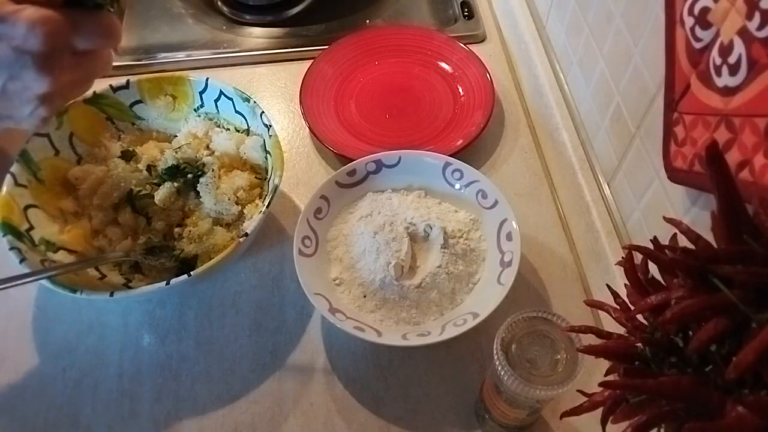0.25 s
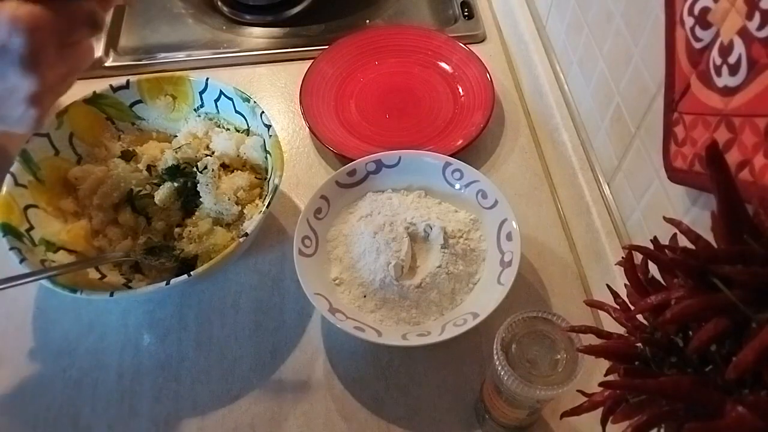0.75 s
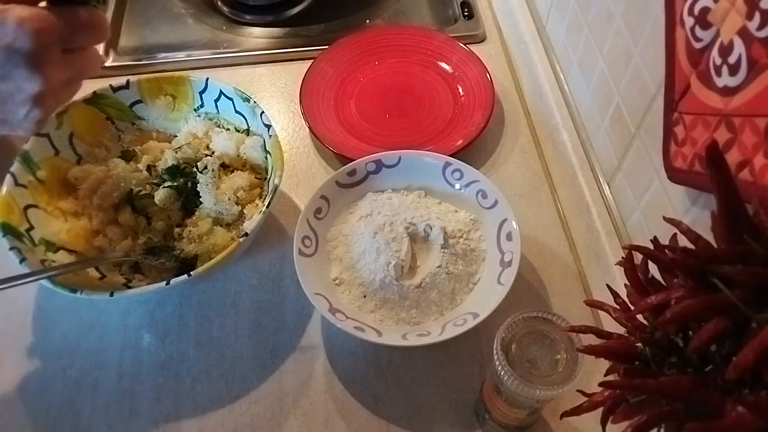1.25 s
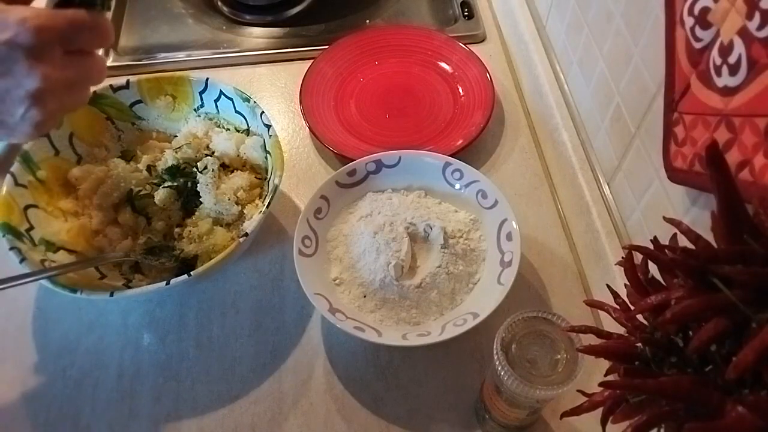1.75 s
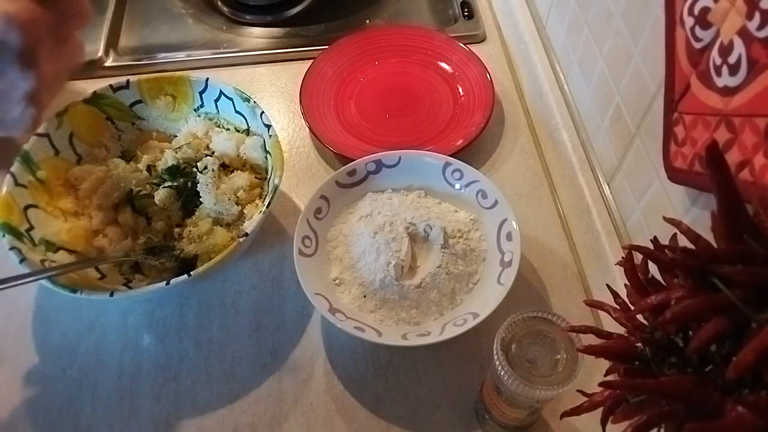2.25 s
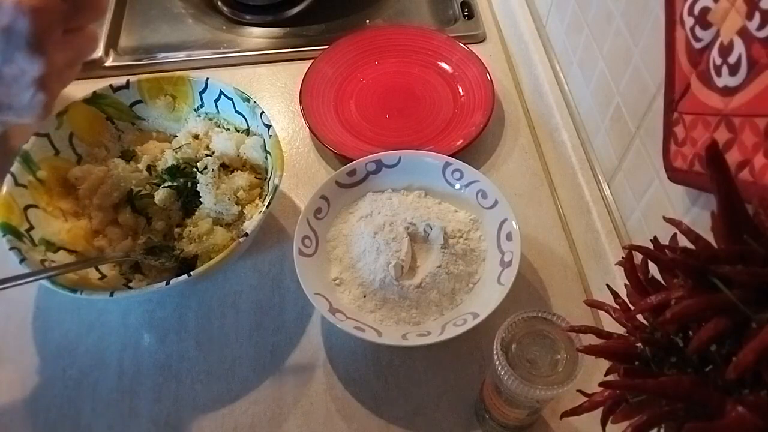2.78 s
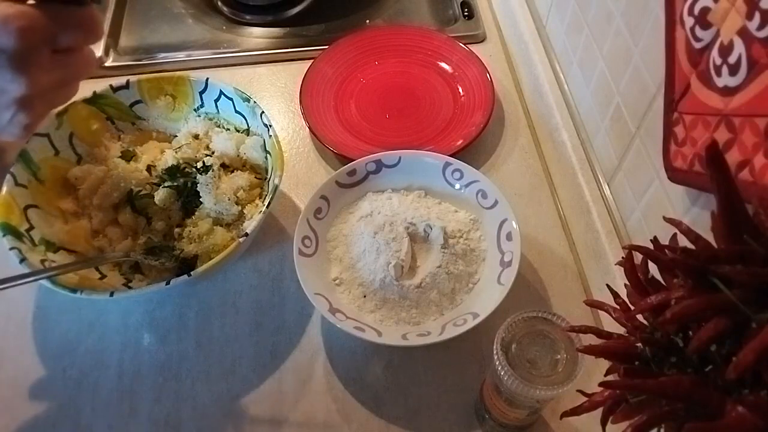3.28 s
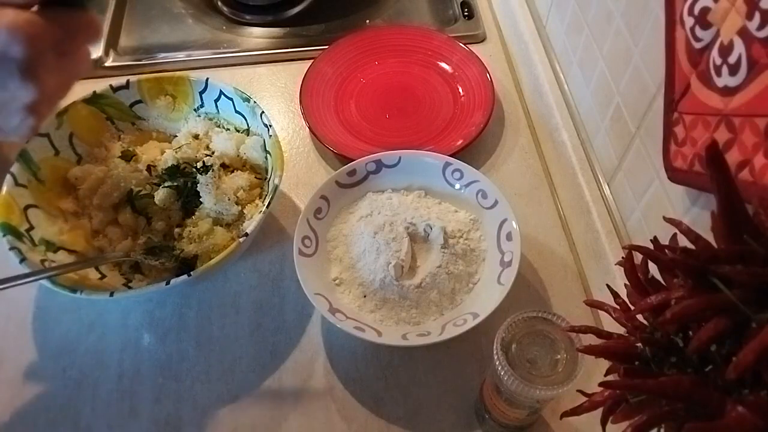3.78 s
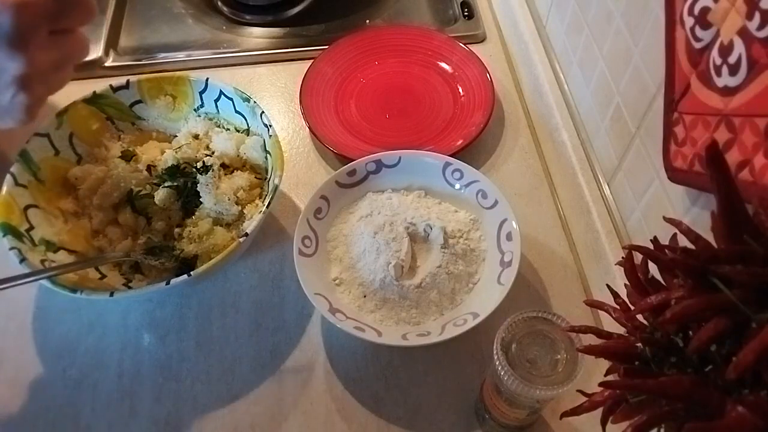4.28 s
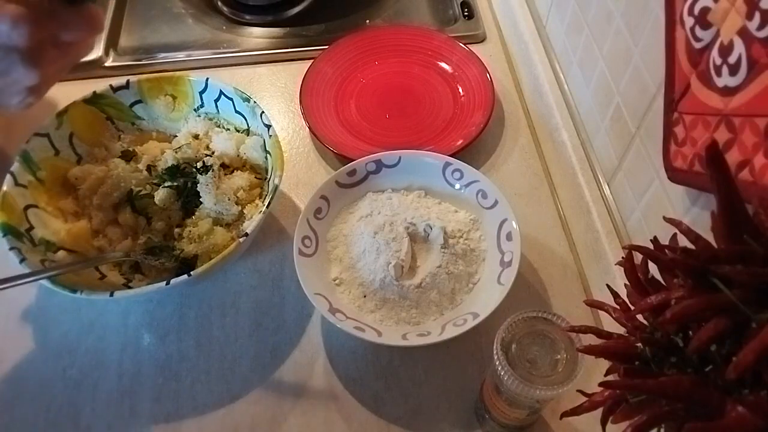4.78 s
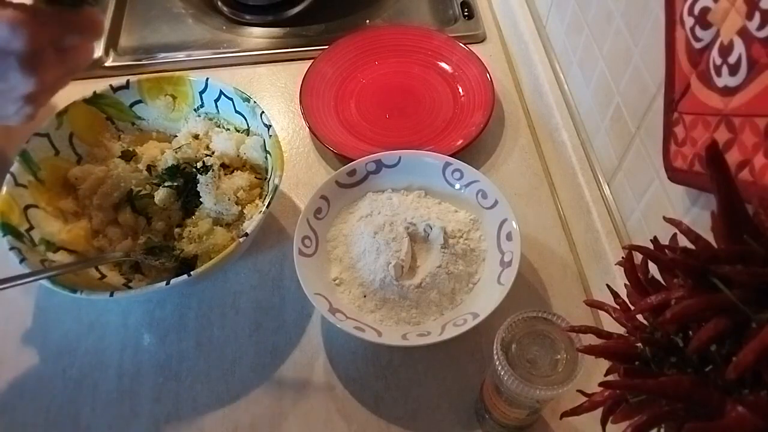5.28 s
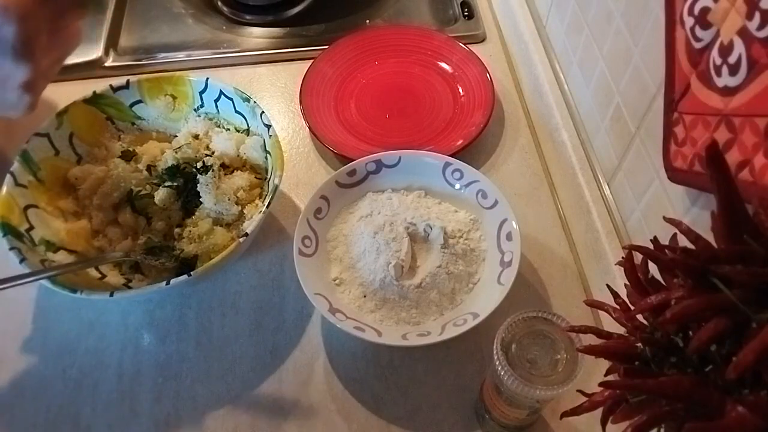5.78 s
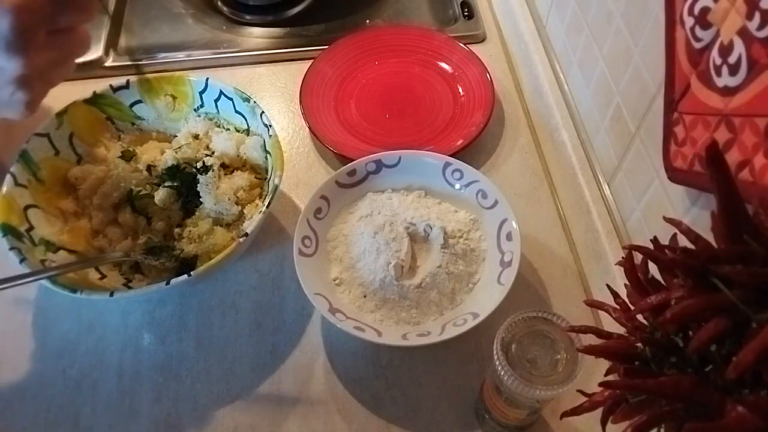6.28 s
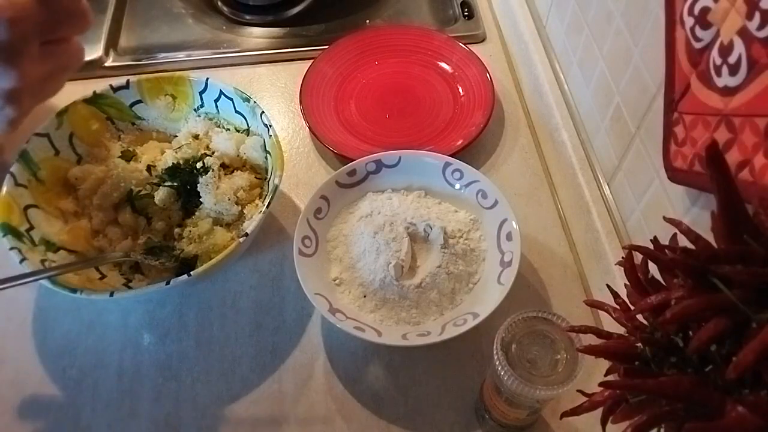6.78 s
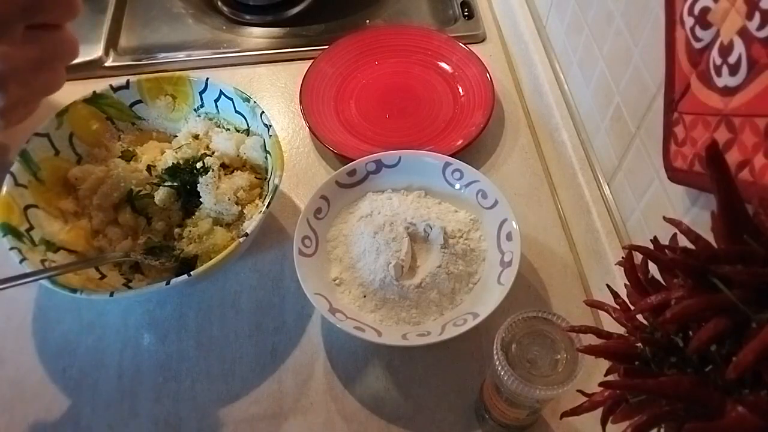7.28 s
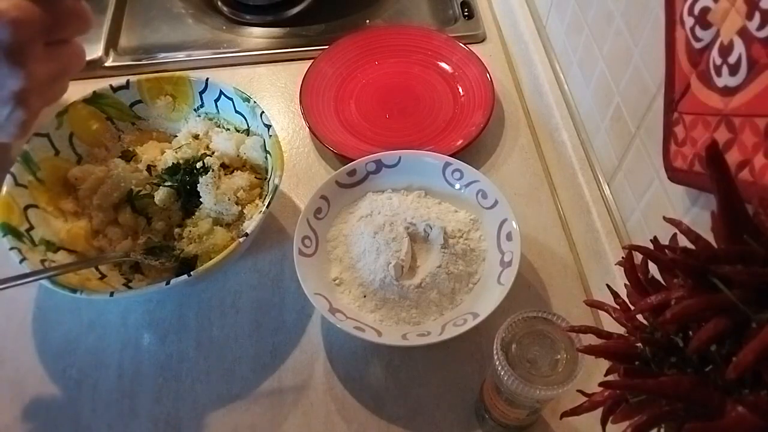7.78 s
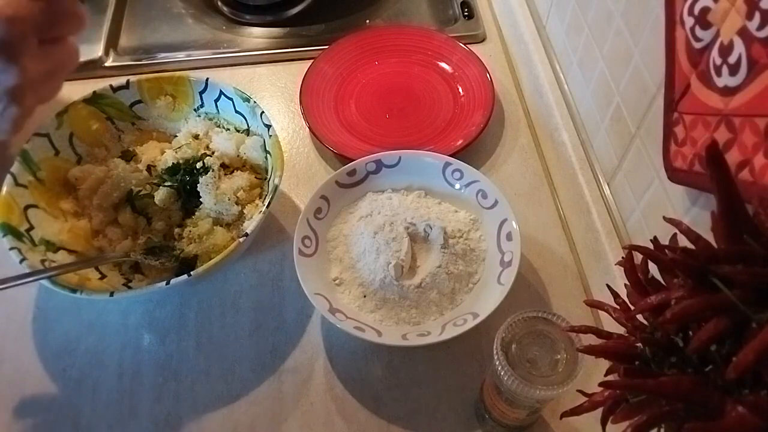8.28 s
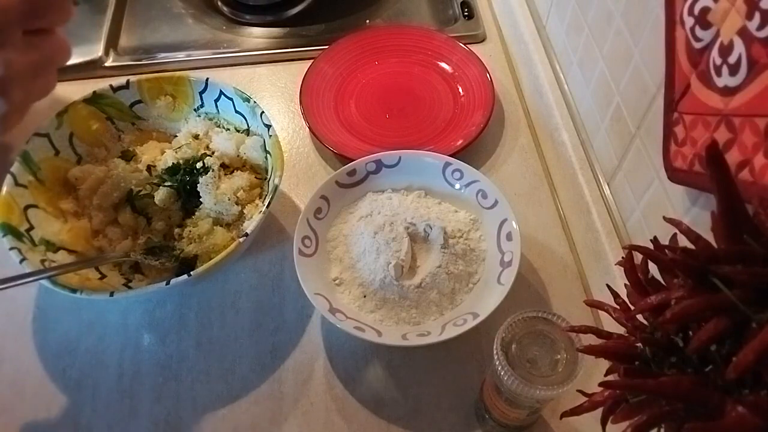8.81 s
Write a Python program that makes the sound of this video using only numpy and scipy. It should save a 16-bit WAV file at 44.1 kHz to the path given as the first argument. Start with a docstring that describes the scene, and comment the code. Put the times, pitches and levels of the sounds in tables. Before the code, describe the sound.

A constant low fan drone with electrical hum fills a hard, tiled kitchen. Over it, close and bright, kitchen scissors snip through parsley about twelve times in nine seconds, slightly unevenly. Every snip is a cluster of tiny crunchy clicks from leaves and stalks, with a thin metallic edge and a very short echo; the bunch rustles softly as it is shifted between cuts.

```python
"""Scissors cutting parsley under an extractor fan

Kitchen scissors cut a bunch of parsley close to a stereo microphone. Stalks and leaves crack in bursts of
tiny clicks: noise gated by random decays, coloured by fibre thickness and ringing steel. Tiles add echoes.
An extractor fan drones: blade tone, mains hum and other steady tones, and air noise ringing room modes.
"""
import sys
import numpy as np
from scipy import signal
from scipy.fft import rfft, irfft, next_fast_len
from scipy.io import wavfile
from scipy.ndimage import uniform_filter1d

SR = 44100
rng = np.random.default_rng(int(sys.argv[2]) if len(sys.argv) > 2 else 0)


def master_out(mix):
    """Clip the mix to full scale and print it as 16-bit PCM to the path in sys.argv[1]."""
    frames = np.transpose(np.atleast_2d(mix))
    ceiling = np.clip(frames, -1, 1)
    pcm = np.round(ceiling * 32767).astype(np.int16)
    wavfile.write(sys.argv[1], SR, pcm)


N = 399105

# crack spectrum at each port, relative: f/Hz, left level/dB, right level/dB
CRACK_SPECTRUM = [(1280, -24, -13.5), (2040, -22.5, -22.5), (3010, -23.5, -19.5), (4140, -17.5, -14),
                  (5530, -10, -8.5), (7100, -7.5, -7), (8530, -8, -7), (10630, -5, 0), (11630, -3.5, 0),
                  (11900, 2.5, 2), (14800, 2.5, 0), (14600, -4, 2), (15900, 3, 3)]
# steel resonances: f/Hz, width/Hz, level over plain crack/dB
STEEL_MODES = [(2330, 96, 0.5), (6180, 190, -10), (7830, 240, -4.5)]
# crossovers between the six fibre bands, two bands per thickness: f/Hz
BAND_EDGES_HZ = [3200, 4500, 6500, 9000, 12500]


def scissors():
    """Snapping fibres excite the steel: thick ones sound low, thin ones high, each at its own moments."""
    size = next_fast_len(N)
    hz = np.arange(size // 2 + 1) * SR / size
    steel = 1 + sum(undb(db) / (1 + 2j * (hz - f) / width) for f, width, db in STEEL_MODES)
    ports_db = [on_log(hz, CRACK_SPECTRUM, order=1), on_log(hz, CRACK_SPECTRUM, order=2)]
    colour = steel * undb(ports_db)
    lowpasses = [1 / (1 + (hz / edge) ** 10) for edge in BAND_EDGES_HZ]
    band_powers = np.diff([0 * hz] + lowpasses + [1 + 0 * hz], axis=0)
    filters = colour * np.sqrt(band_powers)[:, None]
    # unit rms per thickness, over its two bands
    band_ms = np.mean(abs(filters) ** 2, axis=(1, 2))
    thickness_rms = np.sqrt(band_ms.reshape(3, 2).sum(axis=1))
    power = crack_power() + undb(2 * rustle_db())
    noise, out = port_noise(), 0
    for envelope, response, rms in zip(power, filters, np.repeat(thickness_rms, 2)):
        clicks = np.sqrt(envelope * click_power()) * noise
        out = out + rfft(clicks, size) * response / rms
    return irfft(out, size)[:, :N]


STALK_SPREAD_DB = 2.


def crack_power():
    """Each crack swells and decays exponentially in power; its two bands per thickness tilt at random."""
    span = SR // 5
    power = np.zeros((6, N + span))
    rows = cracks()
    tilts_db = STALK_SPREAD_DB * rng.standard_normal((len(rows), 3, 1)) * [1, -1]
    for (t, *thickness_db, rise_ms, fall_ms), tilt_db in zip(rows, tilts_db):
        start = int(t * SR)
        # power decays twice as fast as amplitude
        shape = swell(span, span // 2, rise_ms * SR / 2000, fall_ms * SR / 2000)
        bands_db = np.c_[thickness_db] + tilt_db
        power[:, start:start + span] += undb(2 * bands_db).reshape(-1, 1) * shape
    return power[:, span // 2:span // 2 + N]


# stalks snapping at once: t/s, middle-fibre level/dB, thin over middle level/dB, fall/ms
STALK_SNAPS = [(.4289, -64.5, -3, 4.4), (0.531, -64.5, 26, 1.6), (.594, -52.5, 16, 1.8),
               (.6145, -60, 11, 4), (.7656, -68, 13, 4), (.779, -58.5, 9.5, 6.2), (1.4868, -48.5, 3, 5.5),
               (1.9287, -70, 17, 4.4), (1.981, -64, 16, 2.4), (2.11, -55.5, 9, 19), (2.1532, -61, 5, 25),
               (2.2052, -62, 6, 7), (2.535, -62, -12, 5), (2.7768, -52, 11, 2.1), (2.7961, -57, 14, 4),
               (2.8277, -38.5, 5, 3.7), (2.875, -64, 11, 4), (2.9017, -61.5, 17, 5),
               (3.2016, -54.5, -17, 1.2), (3.348, -69, 11, 4.4), (3.4518, -77, 18, 4),
               (3.5151, -65.5, 18.5, 5.6), (3.607, -48, 4, 3.8), (4.0066, -66, -16, 3.5),
               (4.2224, -75, 15, 4.5), (4.243, -63, 21, 2.6), (4.332, -48.5, 2, 8.2),
               (4.3687, -58.5, -2, 14), (4.4503, -45, -3, 3.3), (4.467, -52, 11, 1.6), (4.4762, -45, -4, 2),
               (4.4913, -35, -8, 1.7), (4.5011, -36.5, 1, 2.4), (4.8621, -75, 8, 10.5),
               (5.0068, -55, 15, 3.2), (5.019, -56, 13, 4.7), (5.043, -56, 12, 14), (5.066, -42, 7, 3.4),
               (5.1037, -54, 7, 4.2), (5.118, -52, 4, 3.9), (5.1929, -42.5, 1.5, 1.4),
               (5.215, -58.5, 1, 13), (5.5136, -62, 2, 4.3), (5.6083, -73, 10.5, 7), (5.64, -67, 12, 17),
               (5.672, -50.5, -22, 5.1), (5.7665, -63, 5, 9), (5.7922, -62.5, 0, 7.2),
               (6.279, -49.5, -1, 3.6), (6.3719, -67, 3, 3.4), (6.395, -52, 9.5, 1.9),
               (6.4637, -56.5, 2, 4), (6.4724, -47.5, -5, 3.7), (7.3754, -70, 20, 6),
               (7.4218, -49.5, 4, 3.6), (7.447, -51, 6, 6.5), (7.4573, -48, 3, 6.5),
               (7.5068, -46.5, 1, 4.1), (7.9273, -79, 21, 3.8), (7.9394, -54.5, 8.5, 20),
               (7.9683, -49, 12, 4), (7.973, -45.5, 13, 2.3), (8.0183, -60, 14, 4.5), (8.0304, -57, 4, 7.4),
               (8.05, -52, 5, 4.7), (8.088, -49.5, 8, 4.5), (8.245, -72, 0, 3), (8.6164, -63, 7, 21),
               (8.644, -50, -4, 2.7), (8.656, -52, 0, 2.1)]
SNAP_RISE_MS = 0.87
# leaf wads crushed, swelling as they give way: peak t/s, middle-fibre level/dB, thin over middle level/dB, fall/ms
LEAF_CRUSHES = [(.5563, -64, 16, 4.5), (.5831, -62, 3, 8), (0.624, -56.5, 8, 11), (0.649, -44, 6.5, 6.3),
                (1.3932, -66, -9, 7), (1.429, -53, 4, 6.2), (1.442, -54.5, 1.2, 15), (1.461, -50, 4, 6.8),
                (1.495, -46.5, 5, 4), (1.619, -53, 14, 4.3), (2.0435, -71, 16, 16), (2.236, -56.5, 3, 7),
                (2.7028, -64, 6, 6), (2.729, -62, 9, 8.9), (2.7832, -64, 16, 5), (2.813, -40.5, 4.5, 7.4),
                (3.526, -63.5, 14, 3), (3.5656, -74, 10.5, 5), (3.5884, -52.5, 10.5, 5.7),
                (3.7234, -59, 10, 7.3), (4.254, -49, 12, 4.2), (4.281, -54, 0, 17), (4.305, -39.5, -2, 4.5),
                (5.7058, -62.5, -8, 20), (6.3, -62.5, 5, 21), (6.4075, -60, -6, 6.5),
                (7.984, -48.5, 3, 5.3), (8.059, -54, 6, 6.5), (8.077, -45.5, 0, 5.1),
                (8.5288, -48.5, 1, 6.9), (8.5534, -59, 0, 16)]
CRUSH_RISE_PER_FALL = 0.85
# blade closings: start t/s, shut t/s, rustle level before band weights/dB, thick over middle level when shut/dB
BLADE_CLOSINGS = [(0.505, 0.783, -69, -3), (1.394, 1.64, -70.5, -3), (1.934, 2.24, -71.5, -14),
                  (2.704, 2.907, -69.5, -8), (3.444, 3.734, -70, -3.5), (4.21, 4.53, -77, -4),
                  (4.983, 5.24, -71.5, -10), (5.606, 5.825, -70, -0.5), (6.285, 6.535, -70, -7),
                  (7.374, 7.51, -64, -13.5), (7.922, 8.1, -76, -7.5), (8.516, 8.66, -67.5, -12)]
THICKEN_DB, LOOSE_DB = 7.5, -14  # thick-fibre rise over a closing; thick over middle between closings


def cracks():
    """Rows t/s, thick, middle, thin level/dB, rise/ms, fall/ms; thicker stalks give way late in a closing."""
    snaps = [(*row, SNAP_RISE_MS) for row in STALK_SNAPS]
    crushes = [(*row, CRUSH_RISE_PER_FALL * row[-1]) for row in LEAF_CRUSHES]
    t, middle_db, thin_db, fall_ms, rise_ms = np.array(snaps + crushes).T
    thick_db = np.full(len(t), 1. * LOOSE_DB)
    for start, shut, _, shut_db in BLADE_CLOSINGS:
        still_open = (shut - t) / (shut - start)
        closing = abs(still_open - .5) < .56  # 6 % margin at each end
        thick_db = np.where(closing, shut_db - THICKEN_DB * still_open, thick_db)
    return np.c_[t, middle_db + thick_db, middle_db, middle_db + thin_db, rise_ms, fall_ms]


# bunch shifting between closings: start t/s, end t/s, level before band weights/dB
BUNCH_SHIFTS = [(0, 0.102, -72.5), (0.297, 0.452, -77), (2.492, 2.62, -79), (3.2, 3.256, -68),
                (3.34, 3.38, -75), (4.01, 4.135, -80), (4.85, 4.89, -78), (5.422, 5.54, -73),
                (6.034, 6.215, -76), (6.677, 6.784, -70.5), (7.04, 7.13, -74.5), (7.25, 7.292, -75),
                (7.793, 7.88, -75.5), (8.41, 8.48, -78), (8.953, 9.05, -88)]
# rustle weight of each fibre band, low to high: level/dB
RUSTLE_BANDS_DB = [-11, -10.5, -10.5, -4, -4.5, -0.5]
CLOSING_RISE_MS, CLOSING_FALL_MS = 14, 67
SHIFT_RISE_MS, SHIFT_FALL_MS = 9, 20
HAND_DB = -87.5  # constant floor, before band weights
RUSTLE_FLICKER_DB, RUSTLE_PATCHY_DB = 2., 2.  # common to all bands; separate in each


def rustle_db():
    """Leaves brush along closing blades and in the hand as the bunch shifts; each band flickers."""
    power = undb(2 * HAND_DB)
    for start, shut, db, _ in BLADE_CLOSINGS:
        power = power + undb(2 * db) * held(start, shut, CLOSING_RISE_MS, CLOSING_FALL_MS)
    for start, end, db in BUNCH_SHIFTS:
        power = power + undb(2 * db) * held(start, end, SHIFT_RISE_MS, SHIFT_FALL_MS)
    bands_db = np.array([db + RUSTLE_PATCHY_DB * walk(14) for db in RUSTLE_BANDS_DB])
    return 10 * np.log10(power) + RUSTLE_FLICKER_DB * walk(40) + bands_db


def held(start_s, end_s, rise_ms, fall_ms):
    """Power envelope: exponential rise before start, 1 until end, exponential fall after."""
    t = np.arange(N) / SR
    before, after = np.maximum(start_s - t, 0), np.maximum(t - end_s, 0)
    return np.exp(-2000 * (before / rise_ms + after / fall_ms))


def swell(size, peak, rise, fall):
    """Exponential rise to a peak and fall from it, all in samples."""
    n = np.arange(size) - peak
    return np.exp(np.where(n < 0, n / rise, -n / fall))


CLICKS_PER_S, CLICK_SPREAD_DB, CLICK_MS = 3500, 2., .5  # spread: mean of exponential; ms: amplitude decay


def click_power():
    """Fibres break at random in decaying clicks of uneven size; mean power 1."""
    struck = rng.random(N) < CLICKS_PER_S / SR
    sizes = struck * undb(2 * CLICK_SPREAD_DB * rng.exponential(size=N))
    power = signal.lfilter([1], [1, -np.exp(-2000 / (CLICK_MS * SR))], sizes)
    return power / power.mean()


SHARED, LEFT_LAG_MS = 0.19, .27  # power fraction common to both ports


def port_noise():
    """Unit-rms noise, partly common to both ports; the common part reaches the left later."""
    common, own = rng.standard_normal(N), rng.standard_normal((2, N))
    common = np.array([np.roll(common, int(LEFT_LAG_MS * SR / 1000)), common])
    return np.sqrt(SHARED) * common + np.sqrt(1 - SHARED) * own


# tile echo bands: centre f/Hz, near-echo t60/s, relative level/dB
TILE_BANDS = [(2860, 0.13, 4), (5840, 0.06, -6), (12200, 0.1, -4)]
FAR_DB, FAR_LONGER = -17, 5.2  # far tail relative to near: level, t60 ratio


def tiles(dry):
    """Dense echoes of near tiles and a weaker, longer tail from far walls, as decaying band noise."""
    t = np.arange(SR // 2) / SR
    echo = np.zeros((2, len(t)))
    echo[:, 0] = 1  # direct sound
    for hz, t60, db in TILE_BANDS:
        band = signal.butter(2, [hz / 1.5, hz * 1.5], "band", fs=SR, output="sos")
        tail = signal.sosfilt(band, rng.standard_normal((2, len(t))))
        near = np.exp(-np.log(1000) * t / t60)
        far = undb(FAR_DB) * np.exp(-np.log(1000) * t / (t60 * FAR_LONGER))
        fade = near + far
        echo += undb(db) * tail * fade / np.sqrt(np.sum(fade ** 2))
    return signal.fftconvolve(dry, echo, axes=1)[:, :N]


def fan():
    """Extractor fan: tones of motor and blades over its air noise."""
    tones = steady_tones() + blade_tone()
    return fan_air() + np.sqrt(2) * tones.imag  # sqrt(2): rms to peak


# blade tone: t/s, level/dB rms before pan
BLADE_LEVEL = [(0, -41.5), (3, -41), (6, -43.5), (7.8, -42.5), (9.05, -49.5)]
BLADE_HZ, BLADE_PAN_DB, BLADE_LEAD_RAD, BLADE_WAVER_RAD = 173.9, 3.5, -0.087, 0.54


def blade_tone():
    """Blades passing on a slightly unsteady shaft give a tone of wandering phase; complex."""
    t = np.arange(N) / SR
    phase = 2 * np.pi * BLADE_HZ * t + BLADE_WAVER_RAD * walk(1.483)
    level_db = np.interp(t, *np.transpose(BLADE_LEVEL))
    return placed(level_db, BLADE_PAN_DB, BLADE_LEAD_RAD) * np.exp(1j * phase)


# mains hum and other steady tones: f/Hz, level/dB rms before pan, left minus right/dB, left lead/rad
STEADY_TONES = [(100, -51, 1, .15), (546, -64, 5, .2), (1446, -85, -9, -2.9)]


def steady_tones():
    """Constant sinusoids, complex: mains hum and two higher tones."""
    t = np.arange(N) / SR
    return sum(placed(db, pan_db, lead) * np.exp(2j * np.pi * f * t) for f, db, pan_db, lead in STEADY_TONES)


# air noise between modes, and microphone hiss: f/Hz, level/dB per Hz before pan, left minus right/dB
AIR_SPECTRUM = [(20, -100, 18), (45, -95, -3), (77, -83, 1), (292, -83, 9), (449, -77.5, -9),
                (764, -83, -3.5), (1117, -97, 0.5), (1475, -101, -9.5), (1890, -106, -2),
                (3570, -116, -3.5), (8150, -121, -1), (12500, -119, -1), (16000, -120, 3)]
AIR_SHARED_HZ = 260.
# standing waves: f/Hz, width at -4.5 dB/Hz, peak level/dB per Hz before pan, left minus right/dB, left lead/rad
STANDING_WAVES = [(60.4, 6, -71.5, 7.5, 0.7), (100.42, 9.2, -59.5, -0.5, 0.02), (120.4, 13, -63, 1.5, 0.1),
                  (144, 10.2, -70, 20, -1), (195, 24.7, -63, 3.5, 0.65), (248.2, 17, -69, -4, -1),
                  (281.6, 14.5, -64, 11, 1), (295.8, 12.5, -68, 3, 0.5), (361.9, 28, -65, 2.5, 0.6),
                  (397.9, 9.2, -68.5, 0.5, -0.9), (429.2, 22.3, -68, -0.5, 1.18),
                  (549.3, 8.7, -70.5, 14, -0.9), (575, 13.4, -73, -11.5, -1.5), (602.5, 44, -74.5, -9, -2),
                  (692, 38, -76.5, -6.5, 0), (872, 47, -79.5, -1, 4.5), (973, 27, -80.5, -7.5, 2.05),
                  (1032.5, 57, -83, 3, 4.5), (1674, 56, -92, 0.5, 4)]


def fan_air():
    """Air noise rings each standing wave, which has its own level and phase at each port."""
    size = next_fast_len(N)
    hz = np.arange(size // 2 + 1) * SR / size
    share = 1 / (1 + (hz / AIR_SHARED_HZ) ** 4)  # long waves are the same at both ports
    air = np.sqrt(share) * white(1, size) + np.sqrt(1 - share) * white(2, size)
    air *= undb(on_log(hz, AIR_SPECTRUM) + SIDES * on_log(hz, AIR_SPECTRUM, order=2) / 2)
    for mode_hz, width, db, pan_db, lead in STANDING_WAVES:
        resonance = 1 / (1 + 2j * (hz - mode_hz) / width) ** 1.493  # steeper than a single resonator
        air += placed(db, pan_db, lead) * white(1, size) * resonance
    return irfft(air, size)[:, :N]


def white(rows, size):
    """Spectra of white noise at 0 dB per Hz."""
    bins = size // 2 + 1
    return np.sqrt(size * SR) / 2 * rng.standard_normal((rows, 2 * bins)).view(complex)


# sign of the stereo offset: left, right
SIDES = np.array([[1], [-1]])


def placed(db, pan_db, lead_rad):
    """Complex gains of one vibration at the two ports."""
    return undb(db + SIDES * pan_db / 2) * np.exp(.5j * SIDES * lead_rad)


def walk(rate_hz):
    """Random levels held 1 / rate_hz and slewed twice; standard deviation 1."""
    hold = int(SR / rate_hz)
    steps = np.repeat(rng.standard_normal(N // hold + 1), hold)[:N]
    slow = uniform_filter1d(uniform_filter1d(steps, hold), hold)
    return slow / np.std(slow)


def on_log(hz, table, order=1):
    """One column of a spectrum, interpolated on a log-frequency axis."""
    rows = np.array(table, float)
    return np.interp(np.log(hz + 1), np.log(rows[:, 0]), rows[:, order])


def undb(db):
    """Amplitude ratio of a level in dB."""
    return 10 ** (np.asarray(db) / 20)


def scene():
    """Scissors in the tiled room over the fan."""
    return tiles(scissors()) + fan()


TOP_HZ = 15700


def record(dry):
    """The recorder cuts the top: steep elliptic low-pass."""
    return signal.sosfilt(signal.ellip(10, .2, 70, TOP_HZ, fs=SR, output="sos"), dry)


dry = scene()
out = record(dry)
master_out(out)
```